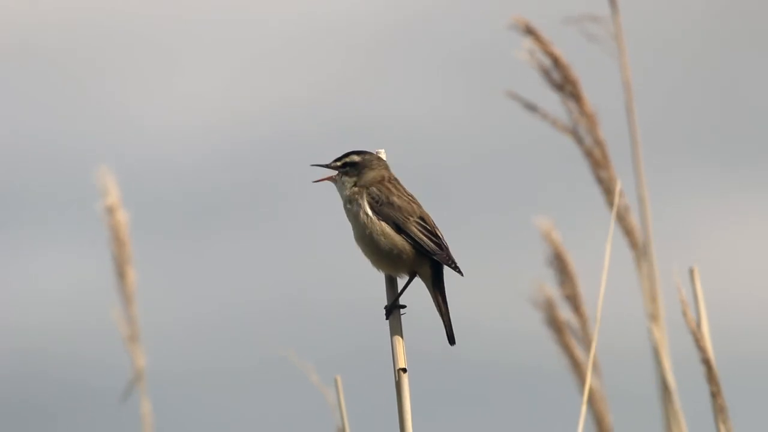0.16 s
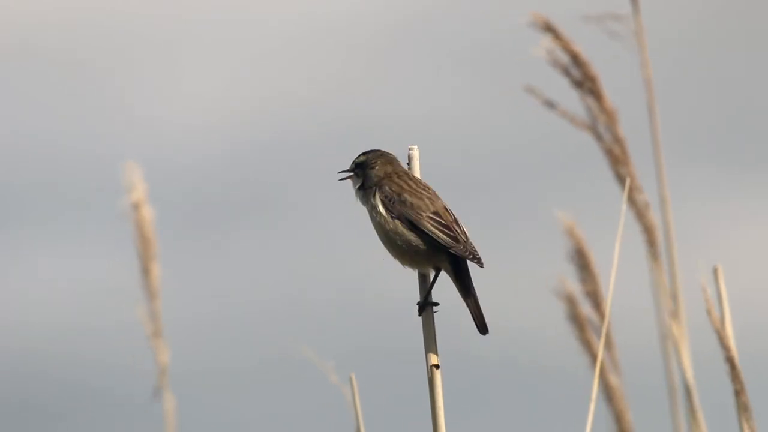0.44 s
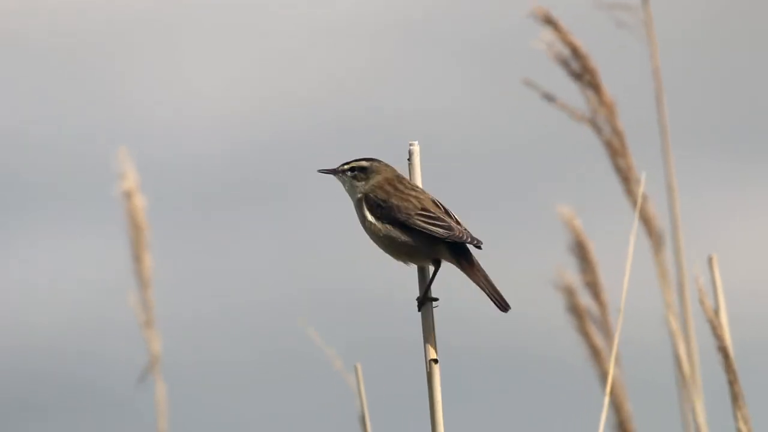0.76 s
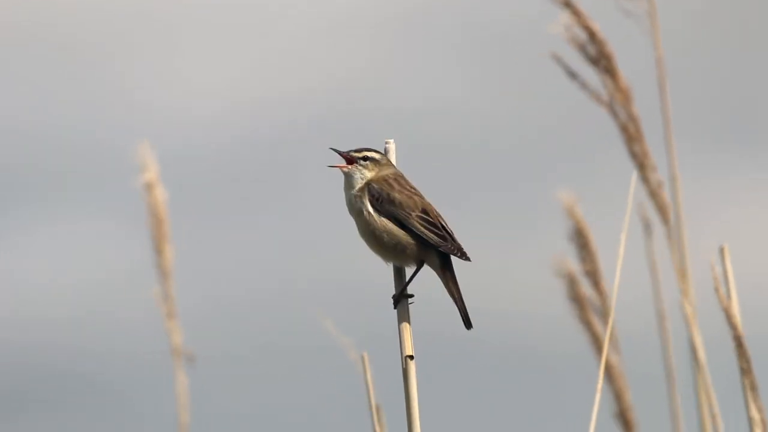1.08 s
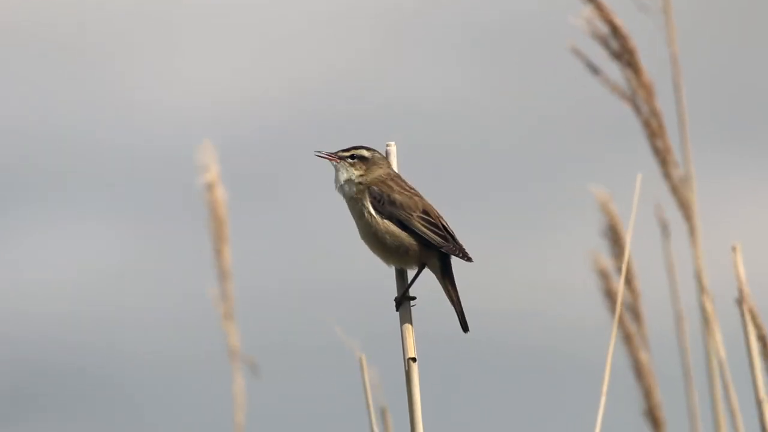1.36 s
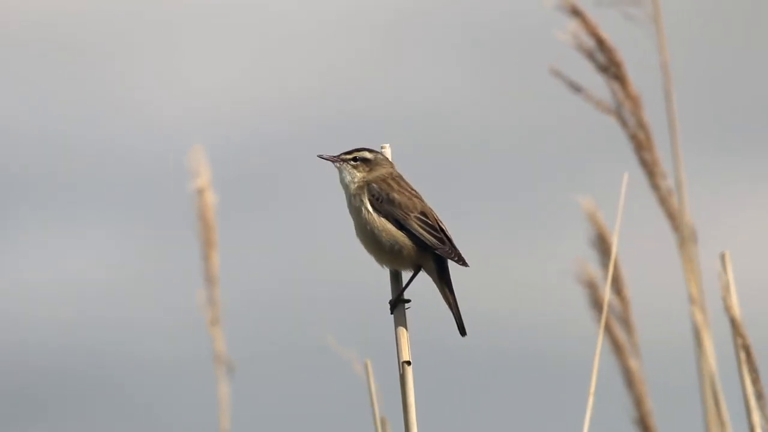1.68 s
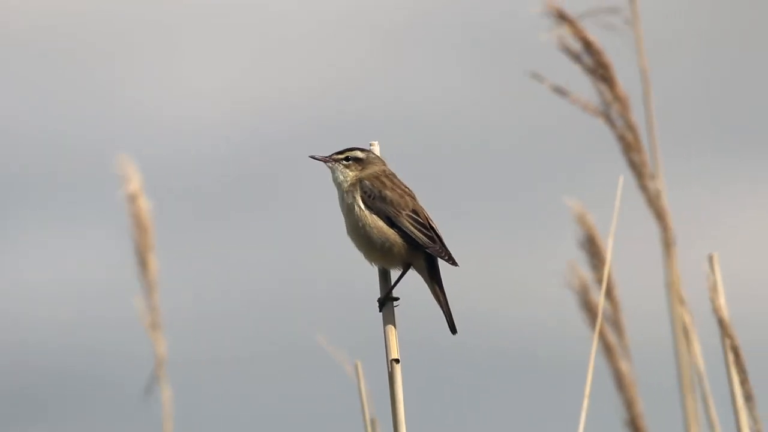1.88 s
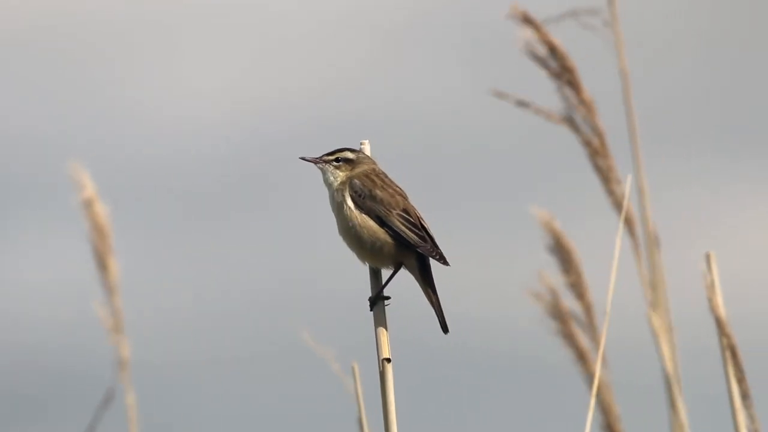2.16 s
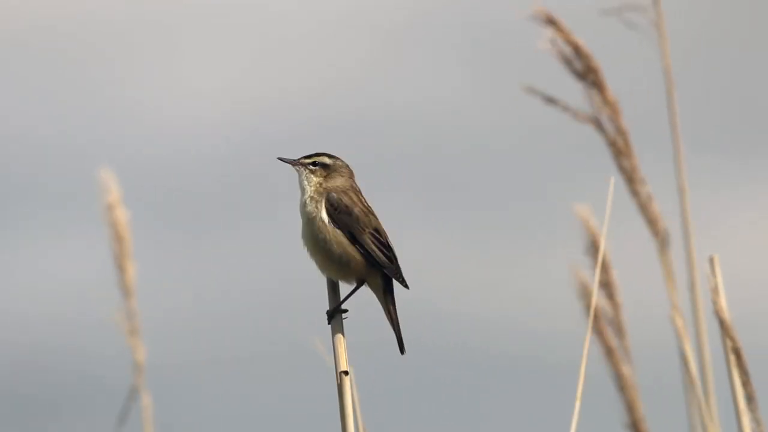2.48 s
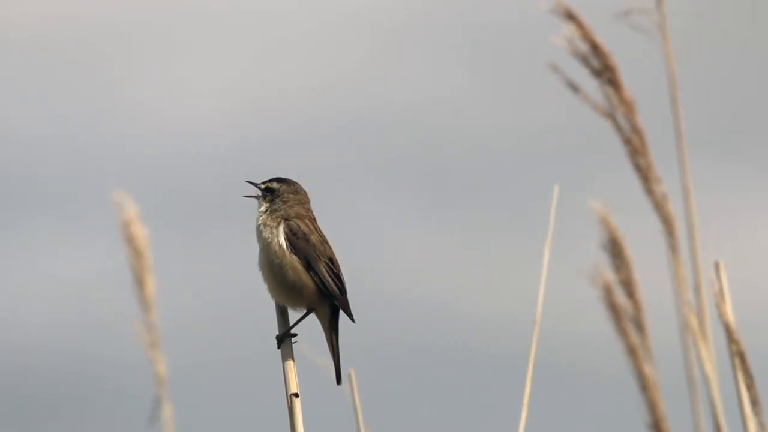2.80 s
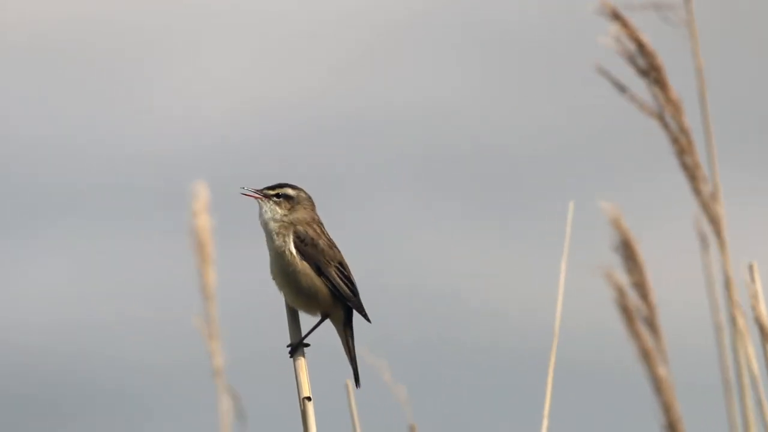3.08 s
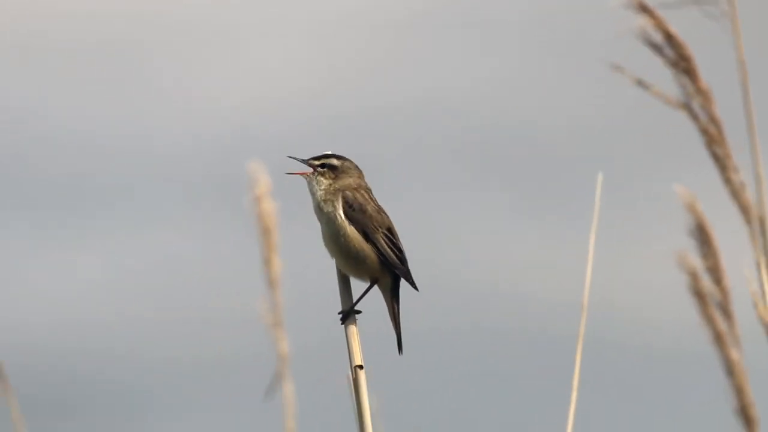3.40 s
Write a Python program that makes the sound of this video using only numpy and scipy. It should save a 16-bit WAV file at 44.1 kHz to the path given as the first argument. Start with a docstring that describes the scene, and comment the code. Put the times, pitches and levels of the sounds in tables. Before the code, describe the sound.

A small bird sings close to the microphone: quick runs of buzzy arched notes, dry ticks, then harsh chips, more trills and a fast closing run. Distant birds rasp behind in a breezy open marsh.

```python
"""Sedge warbler in a reedbed

A sedge warbler sings close by: trills of arched harmonic notes, and harsh chips and dry ticks of sliding noise.
Diffuse echoes from the reeds follow each note. Far birds, probably gulls, give rattling, rasping calls;
fainter still are a water bird's low hoots and another small bird's twitters, all built from unsteady sines.
Filtered noise makes the steady wind and the colony's flickering murmur; soft low tones thump on the microphone."""
import sys
import numpy as np
from scipy import signal
from scipy.fft import rfft, irfft
from scipy.io import wavfile
from scipy.ndimage import map_coordinates

SR = 44100
rng = np.random.default_rng(int(sys.argv[2]) if len(sys.argv) > 2 else 0)


def log_audio(samples):
    """Write samples as a 16-bit WAV file to the path given in sys.argv[1]."""
    # one column per channel
    frames = np.atleast_2d(samples).T
    # limit to full scale, then quantise
    limited = np.clip(frames, -1, 1)
    pcm = np.round(limited * 32767).astype(np.int16)
    wavfile.write(sys.argv[1], SR, pcm)


N = 156114


def undb(db):
    """Decibels to gain."""
    return 10 ** (np.asarray(db) / 20)


def unit(x):
    """Scale to a standard deviation of 1."""
    return x / np.std(x)


def colour(x, points):
    """Filter by (Hz, dB) points, joined by straight lines over log frequency."""
    hz, db = np.array(points, float).T
    f = np.arange(len(x) // 2 + 1) * SR / len(x)
    gain = undb(np.interp(np.log(f + 1), np.log(hz), db))
    return irfft(rfft(x) * gain, len(x))


def wander(rate_hz, size):
    """A smooth random curve with a spread of 1; a higher rate moves faster."""
    f = np.arange(size // 2 + 1) * SR / size
    lowpass = np.exp(-(f / rate_hz) ** 2) * (f > 0)
    return unit(irfft(rfft(rng.standard_normal(size)) * lowpass, size))


def around(size):
    """Seconds from the middle of a short sound."""
    return (np.arange(size) - size // 2) / SR


def swell(u, edge):
    """A rounded envelope that is loud for u from -1 to 1; a higher edge is steeper."""
    return np.exp(-np.minimum(np.abs(u), 10) ** edge / 2)


def add(out, at_s, x):
    """Mix a short sound in, centred on a time."""
    i = int(round(at_s * SR)) - len(x) // 2 + np.arange(len(x))
    inside = (i >= 0) & (i < N)
    out[i[inside]] += x[inside]


def fade_in():
    """A straight 2 ms rise at the start."""
    return np.minimum(np.arange(N) / SR / .002, 1)


def scatter(x, echo_db, t60_s):
    """Add a tail of diffuse echoes that builds within milliseconds and fades by 60 dB in t60_s."""
    t = np.arange(SR // 2) / SR
    tail = rng.standard_normal(len(t)) * undb(-60 * t / t60_s) * (1 - np.exp(-t / .004))
    echoes = signal.fftconvolve(x, tail / np.linalg.norm(tail))[:N]
    return x + undb(echo_db) * echoes


def trill_note(rise_s, crest_hz):
    """The pitch arches up and drops back; the sixth partial dominates, with some hiss around it."""
    # partials of the voice: multiple, level_db, crest_focus (how much it is confined to the crest)
    partials = [(4, -10.5, 10.5), (5, -29, -1), (6, -2.5, 0.5), (7, -10.5, 3.5), (8, -16, -0.1),
                (9, -28, 6)]
    # colour of the breathy hiss: frequency_hz, level_db
    hiss_colour = [(2500, -35), (4200, -14.5), (4900, 3), (7000, -2.5), (8300, -23.5), (13000, -52)]
    arch_oct, arch_scatter = 0.27, .14  # typical pitch drop one rise or fall time from the crest; its spread
    fall_s, cut = 0.00916, 1.34  # the voice stops before the fall is complete
    roughness, shimmer, edge, hiss_db = .008, .2, 7, -12.5

    t = around(size=4096)
    u = t / np.where(t < 0, rise_s, fall_s)
    arch = arch_oct * (1 + arch_scatter * rng.standard_normal())
    arched_hz = crest_hz * 2 ** (-arch * 2 * u ** 2 / (1 + u ** 2))
    detune = 0.0088 * rng.standard_normal()
    hz = arched_hz * (1 + detune + roughness * wander(900, len(t)))
    phase = 2 * np.pi * np.cumsum(hz) / SR
    tone = np.zeros(len(t))
    for multiple, db, crest_focus in partials:
        level = undb(db) * np.exp(-crest_focus * u ** 2) * (1 + shimmer * wander(860, len(t)))
        tone += level * np.sin(multiple * phase + wander(60, len(t)))
    hiss = undb(hiss_db) * unit(colour(rng.standard_normal(len(t)), hiss_colour))
    voice = tone * swell(np.where(t < 0, 1.1, cut) * u, edge)
    return voice + hiss * swell((t + 0.0023) / 0.013, 2.12)


def trills():
    """Runs of arched notes, each rising more slowly than the last until a pause."""
    # trill notes: crest_s, level_db
    notes = [(.000, -14.5), (0.252, -11.5), (0.293, -14), (.332, -13.5), (.371, -16), (.409, -17.5),
             (1.104, -14), (1.142, -12), (1.181, -11), (1.218, -12), (1.256, -14.5), (1.293, -18),
             (1.527, -14), (1.566, -11), (1.604, -11.5), (1.643, -13), (1.682, -14.5), (2.815, -17.5),
             (2.850, -14.5), (2.888, -14.5), (2.927, -14.5), (2.965, -15), (3.003, -15.5), (3.241, -14),
             (3.278, -15), (3.316, -16), (3.352, -14.5), (3.393, -15), (3.432, -14)]
    # higher note that closes the song: crest_s, level_db, crest_fundamental_hz, rise_s
    closing_note = (3.462, -15.5, 970, 0.1)
    first_rise_s, rise_growth_s, pause_s = .0135, 0.001003, .1
    crest_hz = 929.7  # fundamental, before each note's small detuning

    out, place, before_s = np.zeros(N), 0, -1
    for at_s, db in notes:
        place = place + 1 if at_s - before_s < pause_s else 0
        before_s = at_s
        add(out, at_s, undb(db) * trill_note(first_rise_s + rise_growth_s * place, crest_hz))
    at_s, db, closing_hz, closing_rise_s = closing_note
    add(out, at_s, undb(db) * trill_note(closing_rise_s, closing_hz))
    return out * fade_in()


def wind():
    """A steady, even wash of air through the reeds; a thin, steady hiss lies at the top."""
    # colour of the wind: frequency_hz, level_db
    wind_colour = [(25, -44), (55, -22), (130, -3), (280, -4.5), (450, 0), (700, -1.5), (1200, -5),
                   (2000, -2.5), (3100, -17), (5400, -10), (7500, -25.5), (10500, -29), (15500, -37)]
    return undb(-41) * unit(colour(rng.standard_normal(N), wind_colour))


def colony(flicker_db):
    """Many far voices blend into a murmur whose half-octave bands flicker on their own."""
    # colour of the murmur: frequency_hz, level_db
    murmur_colour = [(400, -44.5), (540, -5.5), (650, -24), (1600, -4), (2200, -1), (2900, -11.5),
                     (4500, -15), (6000, -24.5), (8000, -25)]
    # slow swells of the murmur around its base level: time_s, level_db
    swells = [(0, 5.5), (.48, 3), (.66, 5.5), (1.3, 3.5), (1.75, -2.5), (2.25, 2), (3.05, 5.5), (3.54, 3.5)]
    base_db = -38

    wash = rfft(colour(rng.standard_normal(N), murmur_colour))
    octave = np.log2(np.clip(np.arange(len(wash)) * SR / N, 32, 16384))
    murmur = np.zeros(N)
    for half_octave in range(16, 26):
        # overlapping triangular bands
        band = irfft(wash * np.maximum(1 - np.abs(2 * octave - half_octave), 0), N)
        murmur += band * undb(flicker_db * wander(11.8, N))
    level_db = base_db + np.interp(np.arange(N) / SR, *np.array(swells).T)
    return undb(level_db) * unit(murmur)


def far_calls():
    """Arched, rasping cries, broken into a rattle: the voice sags and nearly stops between pulses."""
    # calls: middle_s, length_s, pitch_hz, glide_octaves (over the call), level_db, harshness (0-1)
    calls = [(.056, .052, 2666, -0.01, -30, .37), (.36, 0.098, 2222, -.05, -32, .5),
             (.9, .12, 2590, -0.11, -32, 0.82), (1.241, .13, 1999, 0, -18, .2),
             (1.317, 0.072, 1794, -.22, -28, .2), (1.401, 0.062, 2260, -.1, -22.5, .6),
             (1.625, .13, 2493, .1, -36.5, 0.67), (1.645, 0.091, 1737, -.06, -33.5, .6),
             (1.861, 0.043, 1775, -0.007, -28.5, 0.43), (2.055, 0.12, 2175, 0.0069, -23.5, 0.62),
             (2.295, .17, 2282, -0.0042, -25.5, 0.56), (2.632, .14, 2142, -0.056, -19, 0.48),
             (2.959, .08, 2260, .06, -25.5, 0.552), (3.1, .15, 2155, 0, -26.5, 0.82),
             (3.258, 0.059, 2362, 0.063, -24.5, 0.58), (3.295, 0.093, 1320, -.12, -30, .1),
             (3.434, 0.088, 1990, -.11, -27, 0.26), (3.528, 0.081, 1979, .04, -27, .3)]
    # partials from the second multiple of half the pitch upward: level_db
    partials_db = [3.5, -14.5, -13, -19.5, -27]
    arch_oct, edge, roughness = .08, 4.1, 0.0995
    rattle_hz, rattle_rise_hz = 47, 30  # harsher calls rattle faster
    rattle_depth, rattle_sag_oct = .85, .12

    out, t = np.zeros(N), around(size=16384)
    for at_s, length_s, pitch_hz, glide_oct, db, harsh in calls:
        u = np.clip(2 * t / length_s, -2, 2)
        rattle_phase = np.pi * (rattle_hz + rattle_rise_hz * harsh) * t + harsh * wander(40, len(t))
        gap = np.sin(rattle_phase) ** 4
        octaves = glide_oct * u / 2 - arch_oct * u ** 2 - rattle_sag_oct * (gap - gap.mean())
        hz = pitch_hz * 2 ** octaves * (1 + roughness * harsh * wander(460, len(t)))
        half_phase = np.pi * np.cumsum(hz) / SR  # runs at half the pitch
        tone = sum(undb(g) * np.sin(k * half_phase) for k, g in enumerate(partials_db, 2))
        rattled = unit(tone * (1 - rattle_depth * gap))
        add(out, at_s, undb(db) * rattled * swell(2.04 * t / length_s, edge))
    return out


def bursts(rows, shape, length_s):
    """Short, chaotic syllables: a broad band that slides down while the bill is open."""
    fall_oct_per_s = 22
    out, t = np.zeros(N), around(size=4096)
    # reading the noise ever more slowly lowers its pitch
    slide = np.cumsum(2 ** (-fall_oct_per_s * np.clip(t, -length_s, length_s)))
    for at_s, db, centre_hz in rows:
        points = [(centre_hz * 2 ** octaves, gain_db) for octaves, gain_db in shape]
        noise = colour(rng.standard_normal(len(t)), points)
        voice = map_coordinates(noise, [slide], mode="mirror")
        voice = voice / np.sqrt(np.convolve(voice ** 2, np.hanning(64), "same"))  # even out the level
        add(out, at_s, undb(db) * unit(voice) * swell(2 * t / length_s, 2.6))
    return out


def ticks():
    """Dry ticks: very brief noise bursts centred lower than the chips."""
    # ticks: middle_s, level_db, centre_hz
    rows = [(.087, -17.5, 3730), (.104, -15.5, 3700), (.120, -15.5, 3570), (.138, -22, 3580),
            (.495, -24.5, 3800), (.510, -24.5, 3840), (1.379, -22.5, 3600), (1.397, -18, 3300),
            (1.413, -23, 3200), (3.093, -21, 4200), (3.108, -17, 3980), (3.125, -26, 3600),
            (3.142, -27, 3400)]
    # colour of a tick: offset_octaves (from its centre), level_db
    shape = [(-1.4, -35), (-.6, -6), (0, 0), (.25, -5), (.65, -19), (1.3, -55)]
    return bursts(rows, shape, length_s=0.006)


def blips(rows, length_s):
    """Brief, soft, unsteady low tones: sines whose phase wanders."""
    out, t = np.zeros(N), around(size=8192)
    for at_s, hz, db in rows:
        tone = np.sin(2 * np.pi * hz * t + 0.61 * wander(90, len(t)))
        add(out, at_s, undb(db) * tone * swell(2 * t / length_s, 3.6))
    return out


def thumps():
    """Air on the microphone: short low tones with the deepest part filtered away."""
    # thumps: middle_s, level_db (before the high-pass)
    rows = [(0.149, -34), (1.865, -38), (2.688, -39.5), (3.013, -32.5), (3.191, -37.5)]
    pushes = blips([(at_s, 125, db) for at_s, db in rows], length_s=0.018)  # 125 Hz
    return signal.sosfiltfilt(signal.butter(2, 65, "high", fs=SR, output="sos"), pushes)


def chips():
    """Harsh chips: brief noise bursts with a broad band of treble."""
    # chips: middle_s, level_db, centre_hz
    rows = [(.736, -21, 5500), (.767, -21.5, 5150), (.787, -17, 4720), (.882, -27, 5360),
            (.898, -15.5, 5480), (.929, -15.5, 5140), (.951, -15, 4630), (2.399, -17, 5460),
            (2.429, -19.5, 5380), (2.450, -19.5, 4960), (2.594, -20.5, 5540), (2.624, -20, 5200),
            (2.645, -22.5, 4740)]
    # colour of a chip: offset_octaves (from its centre), level_db
    shape = [(-1.5, -27.5), (-0.97, -14), (-0.45, -13.5), (-0.24, 2), (-0.01, 2.5), (0.31, -5.5),
             (0.6, -24), (1.26, -64)]
    return bursts(rows, shape, length_s=0.01)


def hoots():
    """Low notes of a far water bird, each a brief unsteady tone."""
    # hoots: middle_s, pitch_hz, level_db
    rows = [(1.335, 540, -37), (3.445, 646, -30)]
    return blips(rows, length_s=0.02)


def twitters():
    """Thin, buzzy notes of another small bird further along the reeds: sines with a rough pitch."""
    # twitters: middle_s, length_s, pitch_hz, glide_octaves (over the note), level_db
    rows = [(2.312, 0.067, 4410, 0, -31.5), (3.07, .13, 6120, -.2, -37)]
    out, t = np.zeros(N), around(size=8192)
    for at_s, length_s, pitch_hz, glide_oct, db in rows:
        glide = 2 ** (glide_oct * np.clip(t / length_s, -1, 1))
        hz = pitch_hz * glide * (1 + 0.026 * wander(340, len(t)))
        tone = np.sin(2 * np.pi * np.cumsum(hz) / SR) * (1 + .5 * wander(110, len(t)))
        add(out, at_s, undb(db) * tone * swell(2 * t / length_s, 5.2))
    return out


def scene():
    """The near warbler among the reeds, the far birds across the marsh, the wind and the thumps."""
    warbler = scatter(trills() + ticks() + chips(), echo_db=-9, t60_s=0.11)
    far = scatter(far_calls() + hoots() + twitters(), echo_db=-12, t60_s=0.27)
    mix = warbler + wind() + colony(flicker_db=2.5) + far + thumps()
    return mix[None]


def record(dry):
    """The recorder fades in quickly and cuts steeply above 15.8 kHz."""
    top_cut = signal.ellip(10, .1, 80, 15800, fs=SR, output="sos")
    return signal.sosfilt(top_cut, dry * fade_in())


dry = scene()
out = record(dry)
log_audio(out)
```